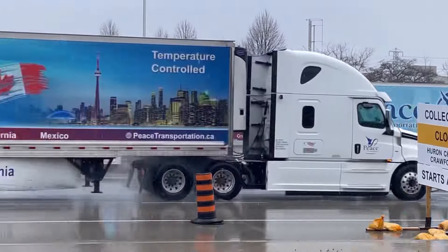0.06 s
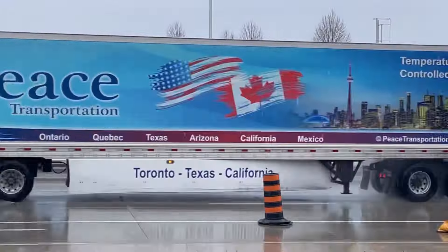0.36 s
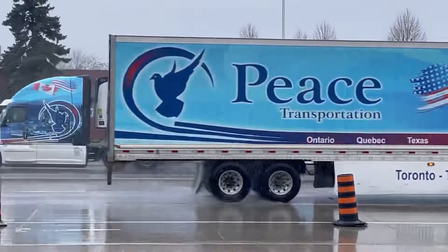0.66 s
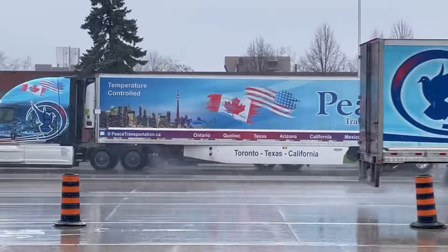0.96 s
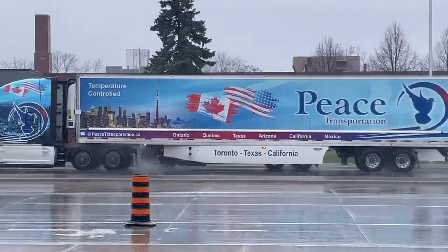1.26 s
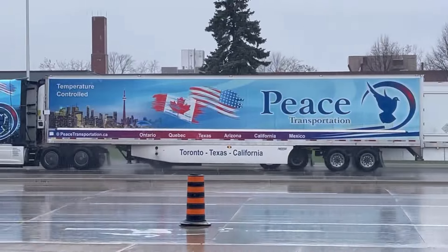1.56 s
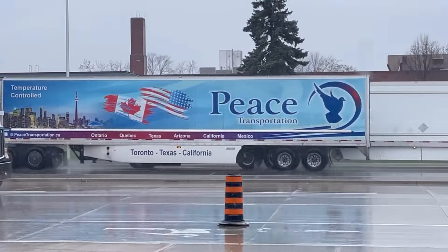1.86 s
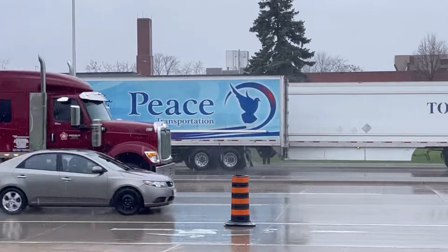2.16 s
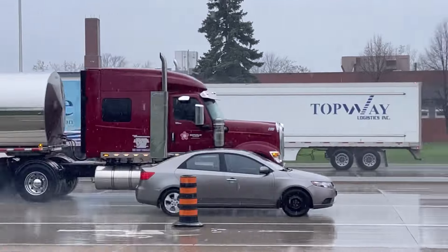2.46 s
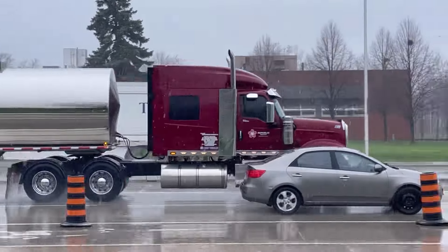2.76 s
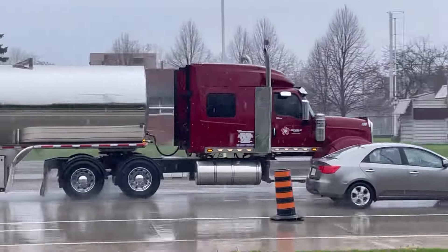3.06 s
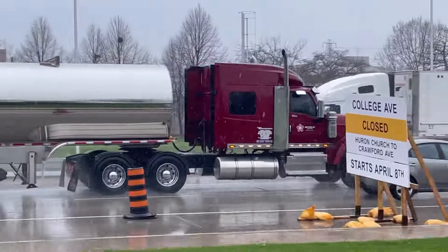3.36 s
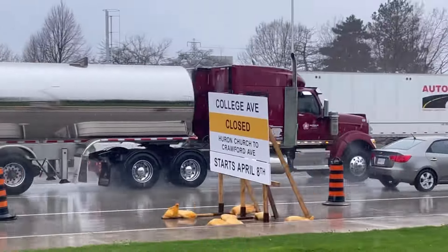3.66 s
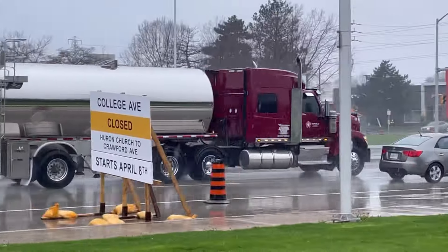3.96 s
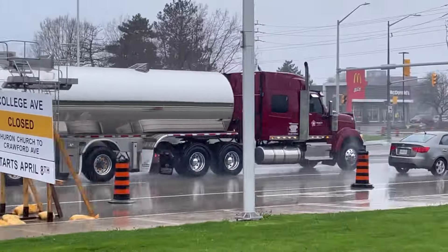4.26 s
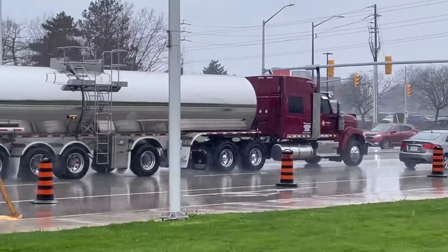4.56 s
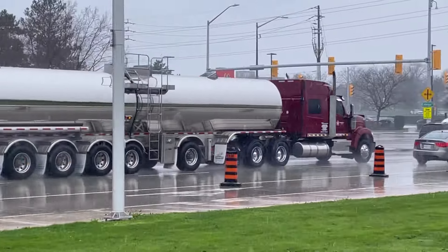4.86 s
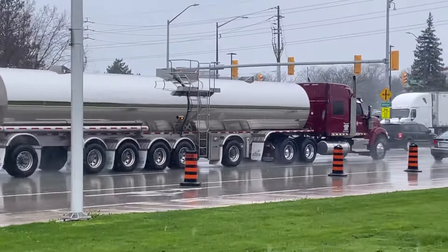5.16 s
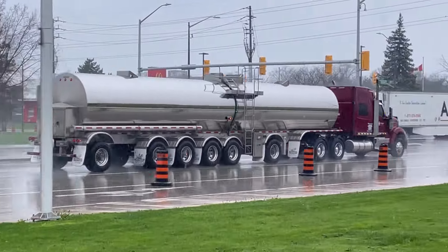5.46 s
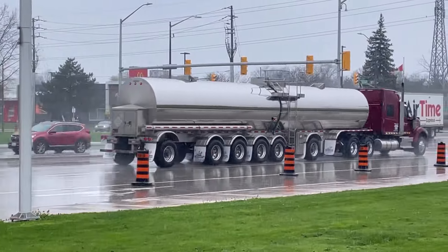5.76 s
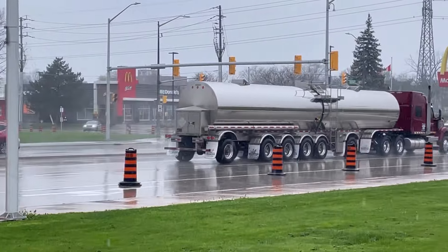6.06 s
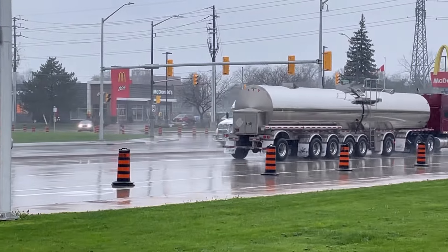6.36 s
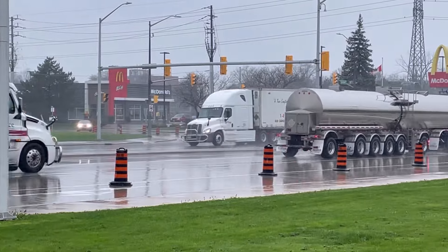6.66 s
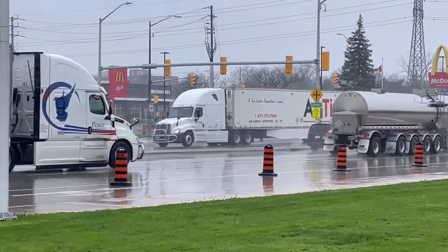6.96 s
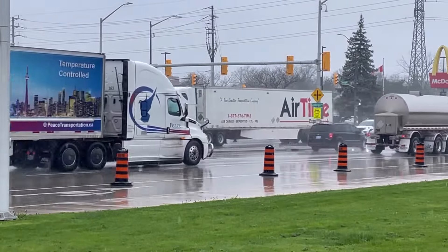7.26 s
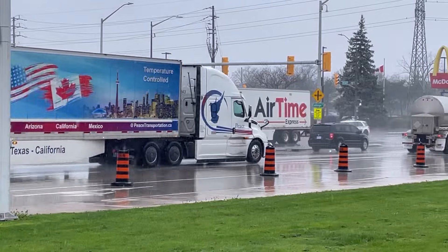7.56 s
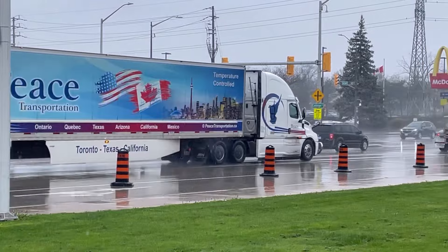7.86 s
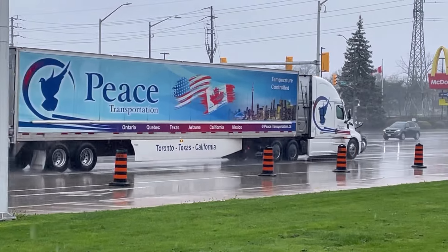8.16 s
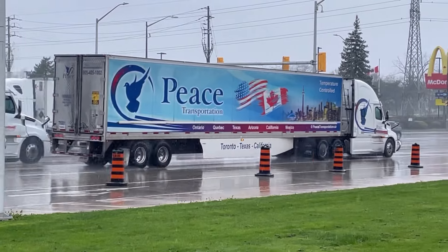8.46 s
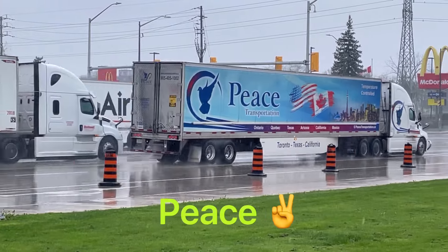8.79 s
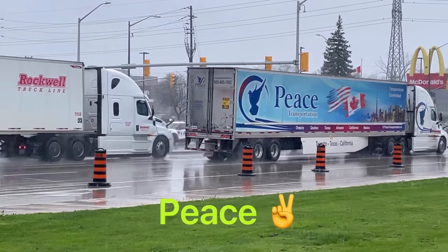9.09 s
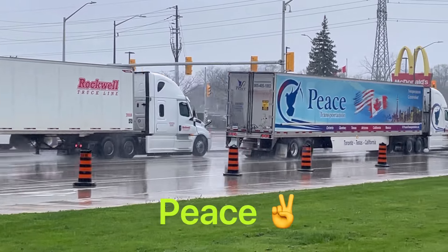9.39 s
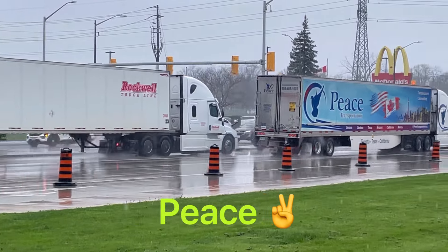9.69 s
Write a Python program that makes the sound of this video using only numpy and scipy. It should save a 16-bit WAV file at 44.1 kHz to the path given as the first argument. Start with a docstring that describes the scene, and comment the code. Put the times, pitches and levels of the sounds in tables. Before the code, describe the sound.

Wet tyre hiss and spray swell and ease as lorries drive by, with diesel engines droning underneath.

```python
"""A rain-soaked multi-lane road, from a two-port microphone on the grass verge. From the start tyres
roar and throw up spray, chassis rumble, a queue idles in the far lanes, and faint engine hums and
tyre or gear whines come and go. Within the first second a tanker's diesel comes by, revs sagging,
while the lorry ahead draws away. Near 5 s a lorry pulls away in a far lane; near 7 s another comes
along the near lane. By the end the sizzle of the spray has sunk in pitch."""
import sys
import numpy as np
from scipy import signal
from scipy.fft import rfft, irfft, next_fast_len
from scipy.io import wavfile
from scipy.ndimage import map_coordinates

SR = 44100
rng = np.random.default_rng(int(sys.argv[2]) if len(sys.argv) > 2 else 0)


def to_wav(sig):
    """Store sig (one row per channel, or 1-D mono) as 16-bit WAV at the path in sys.argv[1].

    Samples outside -1..1 are clipped; the rate is SR.
    """
    pcm = np.clip(np.atleast_2d(sig), -1, 1) * 32767
    pcm = np.round(pcm).astype(np.int16)
    wavfile.write(sys.argv[1], SR, pcm.T)  # frames by channels


N = 429093
TIME = np.arange(N) / SR
FFT_SIZE = next_fast_len(N + 4000, real=True)
BIN_HZ = np.maximum(np.fft.rfftfreq(FFT_SIZE, 1 / SR), 1)


def undb(db):
    """Decibels to gain."""
    return np.exp(np.asarray(db, np.float32) * np.float32(np.log(10) / 20))


def unit(x):
    """Scale to rms 1."""
    return x / np.sqrt(np.mean(x ** 2))


def curves(rows):
    """The columns of a time table, one value a sample."""
    time_s, *columns = np.transpose(rows)
    return [np.interp(TIME, time_s, column) for column in columns]


def per_bin(points):
    """A frequency table read on a log axis."""
    hz, value = np.transpose(points)
    return np.interp(np.log(BIN_HZ), np.log(hz), value).astype(np.float32)


def response(spectrum):
    """Gain at each frequency, falling away steeply past the ends of a spectrum."""
    skirts = np.minimum(BIN_HZ / spectrum[0][0], 1) * np.minimum(spectrum[-1][0] / BIN_HZ, 1)
    return undb(per_bin(spectrum)) * skirts.astype(np.float32) ** 2


def filtered(x, gain):
    """Pass a sound through a gain for each frequency."""
    return irfft(rfft(x.astype(np.float32), FFT_SIZE) * gain, FFT_SIZE)[..., :N]


def wander(rate_hz, time=TIME):
    """A smooth random curve with a spread near 1."""
    steps = rng.standard_normal(1024)
    coarse = time[::64]
    return np.interp(time, coarse, map_coordinates(steps, [coarse * rate_hz], order=2, mode="mirror"))


def noise():
    """Two unrelated white noises."""
    return rng.standard_normal((2, N), dtype=np.float32)


# How alike the road sounds at the two microphone ports: frequency_hz, likeness_share
PORT_LIKENESS = [(50, 0.98), (130, 0.95), (280, 0.87), (420, 0.67), (680, 0.66), (900, 0.46), (2150, 0.47),
                 (2550, .9), (3600, 1), (4900, 1), (6000, 0.89), (7200, 1), (8600, 1), (9100, 0.84),
                 (10100, .7), (10500, .99), (12200, .99), (13000, 0.6), (13900, 1)]

def wash(pair, spectrum, db, flutter_db, rate_hz):
    """Two unrelated signals become one wide, coloured stream whose level flutters."""
    alike = np.clip(per_bin(PORT_LIKENESS), 0, 1)
    mid, side = filtered(pair, response(spectrum) * np.sqrt([1 + alike, 1 - alike]))
    return unit(np.array([mid + side, mid - side])) * undb(db + flutter_db * wander(rate_hz))


# Wheel groups passing the microphone; the span is the time to cover their own distance from the verge:
# closest_s, span_s, tread_db, air_db, swish_db, hiss_db, mist_db
WHEEL_PASSES = [(0.0, 0.23, -32, -37, -38, -40, -39), (.98, 0.42, -32.5, -44, -44, -36, -35),
                (1.75, 0.46, -32.5, -30.7, -31.3, -31.6, -36.3), (2.66, 0.33, -36, -32.4, -34, -32.5, -39),
                (3.35, 0.58, -31.2, -37, -38, -34, -34.4), (4.7, 0.74, -31.3, -30.3, -34.5, -31.5, -39.4),
                (6.25, 0.68, -37.5, -41, -36.5, -35.5, -39.5), (7.27, .3, -33.7, -31, -35, -35.5, -43),
                (7.92, .24, -38, -34, -38.5, -36, -51), (8.7, .3, -43, -35, -37, -43, -47),
                (9.62, 0.36, -33.5, -32.5, -39, -44, -44)]

def passing(kind, far_db):
    """Wheel noise in dB: over steady far traffic, each pass weakens with the square of its distance."""
    power = undb(far_db) ** 2
    for closest_s, span_s, *levels in WHEEL_PASSES:
        db = dict(zip(("tread", "air", "swish", "hiss", "mist"), levels))[kind]
        power = power + undb(db) ** 2 / (1 + ((TIME - closest_s) / span_s) ** 2)
    return 10 * np.log10(power)


# Axles in standing water: centre_s, half_width_s, tread_boost_db, air_boost_db, swish_boost_db
PUDDLE_CROSSINGS = [(.1, .08, 1.2, 1.2, 0), (1.03, .07, .8, .2, 1.8), (1.72, .05, 0, 1.2, .3),
                    (2.66, .06, .8, 1.8, 0), (3.2, .06, 1, 1, .3), (3.55, .04, 2, .3, .5),
                    (4.76, .035, 1, 2, 1), (5.15, .045, 2, 1.6, 1), (5.3, .03, 1.2, 1.2, .7),
                    (5.42, .05, .5, .3, 2.2), (5.81, .07, 2.5, .8, 0), (6.752, .044, 1, 1, .5),
                    (7.02, .05, .8, 1.6, .5), (7.16, .05, 1.6, 1.4, 3), (7.47, .055, .3, 2.9, 1.2),
                    (7.7, .07, 0, 1.5, .8), (7.95, .07, 1.8, 1.2, 1), (8.21, .06, 0, -.8, 1),
                    (9.03, .097, .3, 1.5, 0), (9.59, .055, 3, 1.2, .5)]

def puddles(kind):
    """Extra dB of wheel noise while an axle ploughs through deeper water."""
    column = ("tread", "air", "swish").index(kind)
    return sum(boosts_db[column] * np.exp(-((TIME - centre_s) / half_width_s) ** 2)
               for centre_s, half_width_s, *boosts_db in PUDDLE_CROSSINGS)


# Tread roar and air rush, from the verge: frequency_hz, level_db
TREAD_ROAR = [(300, -23), (450, -5), (560, -2), (750, -0.5), (900, -1.5), (1100, -12), (1800, -30)]
AIR_RUSH = [(600, -18.5), (1000, -2.5), (1350, 0), (1650, -1.5), (1950, -1), (2350, -7), (3200, -22.5)]

def tyres():
    """Tread blocks drum on the asphalt, and air is squeezed out of the grooves."""
    roar_db = passing("tread", far_db=-35) + puddles("tread")
    rush_db = passing("air", far_db=-30.3) + puddles("air")
    roar = wash(noise(), TREAD_ROAR, roar_db, flutter_db=.6, rate_hz=12)
    rush = wash(noise(), AIR_RUSH, rush_db, flutter_db=.47, rate_hz=12)
    return roar + rush


def drops(scatter_db, count=70000):
    """Countless tiny impacts of water, a few much stronger than the rest."""
    landings = rng.integers(0, N, (2, count))
    strength = np.minimum(rng.exponential(size=(2, count)), 6)
    sizes = rng.choice([-1, 1], (2, count)) * undb(scatter_db * strength)
    return unit(np.array([np.bincount(at, size, N) for at, size in zip(landings, sizes)]))


# Water off the wheels, from low swish to fine mist: frequency_hz, level_db
WATER_SWISH = [(1400, -23), (2300, -5.5), (2650, -.5), (3000, -0.5), (3400, -2), (4000, -8.5), (5500, -27)]
WATER_HISS = [(2600, -16), (3500, -4), (4100, 0), (5400, -.5), (7000, -4.5), (9000, -13), (13000, -32)]
FINE_MIST = [(3500, -18), (6000, -4), (7800, .8), (9500, -.5), (10800, -4.8), (12000, -9.5), (14000, -11.5),
             (16000, -14.5)]

def spray():
    """Water swishes out of the treads and tears into a hiss; droplets patter on mudguards and road."""
    swish_db = passing("swish", far_db=-34) + puddles("swish")
    hiss_db = passing("hiss", far_db=-35) + puddles("swish") / 2
    mist_db = passing("mist", far_db=-40.5)
    swish = wash(noise() + .4 * drops(scatter_db=2), WATER_SWISH, swish_db, flutter_db=.5, rate_hz=12)
    hiss = wash(noise() + .5 * drops(scatter_db=2.5), WATER_HISS, hiss_db, flutter_db=.5, rate_hz=14)
    mist = wash(noise() + .83 * drops(scatter_db=3), FINE_MIST, mist_db, flutter_db=.45, rate_hz=26)
    return swish + hiss + mist


# The brightest part of the spray, moving off down the road: time_s, centre_hz, level_db
SPRAY_SIZZLE = [(0, 5000, -47), (.5, 5050, -44), (.95, 5100, -38), (2.3, 4900, -45), (3.7, 4200, -41.5),
                (5.2, 4100, -38), (6.2, 3350, -38.3), (7.3, 3350, -38), (8.7, 2950, -39), (9.73, 2900, -42)]

def sizzle(width_hz):
    """A band of spray noise sinks in pitch as the lorries draw away."""
    centre_hz, db = curves(SPRAY_SIZZLE)
    a, b = filtered(noise(), np.exp(-(BIN_HZ / width_hz) ** 2))
    phase = 2 * np.pi * np.cumsum(centre_hz) / SR
    return unit(a * np.cos(phase) + b * np.sin(phase)) * undb(db)


# Chassis and trailer panels, from the verge: frequency_hz, level_db
CHASSIS_RUMBLE = [(20, -25), (33, -21), (42, -1.5), (58, -.5), (75, -2), (100, -3), (118, -1.3),
                  (135, -2.2), (165, -4.5), (215, -3.3), (250, -12.3), (400, -32)]
PANEL_DRUMMING = [(150, -22), (240, 0), (320, 0), (380, -4), (430, -7.5), (600, -22.5)]
# The rumble eases between platoons of lorries: time_s, level_db
CHASSIS_LEVEL = [(0, -23.5), (1.7, -23), (4.2, -24), (7.6, -24.2), (9.73, -23.2)]

def lorry_bodies():
    """Axles and chassis rumble over the road; trailer panels, shaken by the treads, drum above them."""
    rumble_db, = curves(CHASSIS_LEVEL)
    panel_db = passing("tread", far_db=-35) + puddles("tread") - 2.5
    rumble = wash(noise(), CHASSIS_RUMBLE, rumble_db, flutter_db=.75, rate_hz=8)
    panels = wash(noise(), PANEL_DRUMMING, panel_db, flutter_db=.7, rate_hz=9)
    return rumble + panels


# Rattle of an engine block: frequency_hz, level_db
BLOCK_CLATTER = [(300, -25), (700, -3), (1500, -4), (3000, -8), (7000, -35)]

def diesel(rows, pipe, scatter_db, wobble, throb_db, clatter_db):
    """Six cylinders fire in turn into the exhaust; each firing also rattles the block."""
    firing_hz, db = curves(rows)
    cycles = np.cumsum(firing_hz * (1 + wobble * wander(rate_hz=9))) / SR
    firings = np.flatnonzero(np.diff(np.floor(cycles)))
    cylinders_db = np.resize([.8, -.5, .3, -.8, .5, -.3], len(firings))
    pulses = np.zeros(N)
    pulses[firings] = undb(cylinders_db + scatter_db * rng.standard_normal(2048)[:len(firings)])
    exhaust = unit(filtered(pulses - pulses.mean(), response(pipe)))
    knock = np.exp(-(cycles % 1) / .2)  # dies away within each firing
    clatter = unit(filtered(rng.standard_normal(N) * knock, response(BLOCK_CLATTER)))
    level = undb(db + throb_db * wander(rate_hz=20))
    inside_s = np.minimum(TIME - rows[0][0], rows[-1][0] - TIME)
    fade = np.clip(1 + inside_s / .23, 0, 1)  # before the first row and after the last
    return (exhaust + undb(clatter_db) * clatter) * level * fade


# The queue in the far lanes, heard through gaps in the traffic: time_s, level_db
QUEUE_LEVEL = [(0, -26), (0.5, -28.5), (0.8, -40), (2.3, -30), (3.2, -36), (5.5, -29.5), (6.8, -31),
               (7.4, -36), (9.73, -35)]

def idling_queue(firing_hz):
    """Waiting lorries drone at a low, uneven idle."""
    rows = [(time_s, firing_hz, db) for time_s, db in QUEUE_LEVEL]
    pipe = [(25, -12), (44, -1), (88, -8), (135, -14), (300, -28)]  # frequency_hz, level_db
    return diesel(rows, pipe, scatter_db=2.2, wobble=.0101, throb_db=1.3, clatter_db=-18)


# Faint tones from the lanes: start_s, end_s, first_pitch_hz, last_pitch_hz, level_db, wobble_share
ROAD_HUMS_AND_WHINES = [(0.14, 1.7, 519, 508, -40, .008), (1.7, 4.0, 535, 511, -42, .009),
                        (0.3, 1.3, 773, 765, -40, .009), (1.4, 3.2, 462, 453, -43, .01),
                        (2.3, 3.1, 760, 725, -39.5, .009), (2.2, 3.8, 690, 655, -40, .011),
                        (3.8, 4.7, 682, 655, -38, .011), (4.3, 5.6, 688, 724, -39.5, .016),
                        (-0.6, 0.69, 202, 198, -32, 0.022), (1.45, 2.1, 191, 189, -33, .01),
                        (-0.95, 1.196, 292, 280, -35.5, 0.0296), (4.3, 5.5, 166, 160, -35, .015),
                        (3.6, 5.5, 340, 326, -39.5, 0.0149), (4.3, 5.1, 807, 806, -40, .009),
                        (5.5, 6.2, 353, 347, -39, .005), (5.5, 8.8, 392, 383, -44.5, .007),
                        (6.3, 6.85, 496, 481, -42, .005), (6.1, 7.1, 192, 195, -35, .014),
                        (6.2, 7.7, 824, 854, -44, .009), (6.2, 9.3, 781, 792, -44, .005),
                        (7.1, 7.8, 468, 458, -42.5, .006), (7.05, 7.8, 1180, 1179, -38.8, .0035),
                        (7.7, 8.65, 1183, 1179, -42, .003), (8.7, 9.45, 1190, 1187, -42.5, .003),
                        (8.4, 10.1, 194, 187, -33, .01), (8.3, 10.2, 350, 350, -42.5, .005)]

def hums_and_whines(waver_db):
    """Faint engine hums and tyre or gear whines swell, waver and slide."""
    out = np.zeros(N)
    for start_s, end_s, first_hz, last_hz, db, wobble in ROAD_HUMS_AND_WHINES:
        span = slice(*np.searchsorted(TIME, [start_s, end_s]))
        time = TIME[span]
        progress = (time - start_s) / (end_s - start_s)
        pitch_hz = (first_hz + (last_hz - first_hz) * progress) * (1 + wobble * wander(40, time))
        tone = np.sqrt(2) * np.sin(2 * np.pi * np.cumsum(pitch_hz) / SR)
        swell = 2 * np.sqrt(progress * (1 - progress))
        out[span] += tone * swell * undb(db + waver_db * wander(18, time))
    return out


# Muffled exhaust of the tanker, the lorry ahead and the near-lane lorry: frequency_hz, level_db
MUFFLED_PIPE = [(25, -20), (45, -1), (85, 0), (115, -3), (175, -12), (260, -19), (500, -27), (1200, -48)]
# The tanker passing the microphone: time_s, firing_hz, level_db
TANKER_RUN = [(0.6, 99, -28), (1.03, 94.5, -23), (1.34, 91.1, -25.5), (1.72, 88, -21.8), (2.1, 86.6, -27.5),
              (2.4, 85.3, -24.5), (2.95, 83.2, -22.5), (3.45, 82.4, -27.5), (3.7, 82, -27), (4.15, 82, -36)]

def tanker():
    """A smooth-firing diesel whose revs sag as it comes by."""
    return diesel(TANKER_RUN, MUFFLED_PIPE, scatter_db=.6, wobble=.0025, throb_db=.7, clatter_db=-17)


# Up the road, ahead of the tanker: time_s, firing_hz, level_db
LEADING_RUN = [(0.65, 108, -33), (1.2, 110, -32), (1.65, 111.5, -28.5), (2.1, 112, -33)]

def leading_lorry():
    """A faster-turning diesel gains revs as it draws away."""
    return diesel(LEADING_RUN, MUFFLED_PIPE, scatter_db=1, wobble=.005, throb_db=1.3, clatter_db=-17)


# An exhaust stack across the road: frequency_hz, level_db
EXHAUST_STACK = [(30, -20), (62, 0), (130, 1), (195, -6), (260, -18), (400, -27), (1200, -48)]
# Its lorry, in a far lane: time_s, firing_hz, level_db
FAR_RUN = [(4.9, 60.5, -39), (5.7, 61, -32), (6.3, 66, -31), (7.2, 65.5, -35), (8.0, 64.3, -28.5),
           (8.7, 63.3, -32), (10, 62.98, -33)]

def far_lorry():
    """A low-revving diesel throbs through its stack as it pulls away."""
    return diesel(FAR_RUN, EXHAUST_STACK, scatter_db=1.6, wobble=.012, throb_db=1.6, clatter_db=-16)


# A lorry in the lane nearest the microphone: time_s, firing_hz, level_db
NEAR_RUN = [(6.9, 86, -38), (7.3, 87.5, -30.5), (7.7, 90, -34), (8.0, 91.8, -28.5), (8.6, 91, -34),
            (9.6, 91, -29.5)]

def near_lorry():
    """A rough-firing diesel clatters past close by."""
    return diesel(NEAR_RUN, MUFFLED_PIPE, scatter_db=3, wobble=.008, throb_db=1.3, clatter_db=-14)


def scene():
    """From the verge: wide road noise, with the engines, hums and whines in the middle."""
    road = tyres() + spray() + sizzle(width_hz=750) + lorry_bodies()
    background = road + idling_queue(firing_hz=44.1) + hums_and_whines(waver_db=1.9)
    return background + tanker() + leading_lorry() + far_lorry() + near_lorry()


# Phase of the microphone's left port against its right: frequency_hz, lead_rad
LEFT_PORT_LEAD = [(20, 0), (270, 0.18), (400, .6), (800, 0.45), (1700, 0.62), (2300, 0.35), (2750, -0.15),
                  (3600, 0), (4950, -.05), (5400, -0.95), (6300, -1.25), (6950, -3.1), (8700, -3.14),
                  (9100, -2.2), (10000, -1.2), (10400, 0), (12300, 0), (12900, 1.2), (13300, 2.6),
                  (13900, 3.14)]

def record(dry):
    """Two close ports shift the phase between the sides; the left is fuller in bass; the top is cut."""
    left_db = per_bin([(40, .7), (200, 1.5), (650, .9), (1100, -.1), (1700, -.3), (2700, 1.2), (3800, 0)])
    left_gain = undb(left_db / 2) * np.exp(.5j * per_bin(LEFT_PORT_LEAD))
    ports = filtered(dry, np.array([left_gain, 1 / left_gain]))
    top_hz = 15700
    return signal.sosfilt(signal.ellip(10, .1, 80, top_hz, fs=SR, output="sos"), ports)


dry = scene()
out = record(dry)
to_wav(out)
```